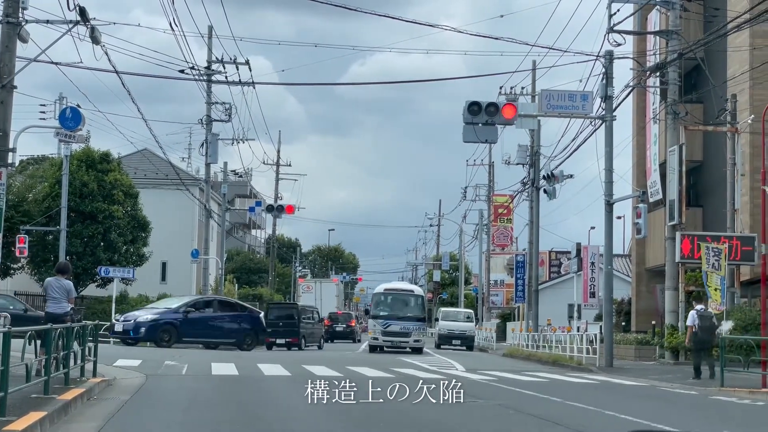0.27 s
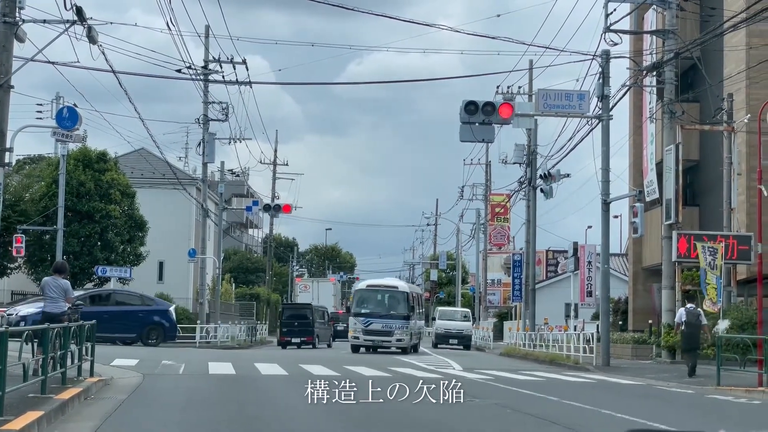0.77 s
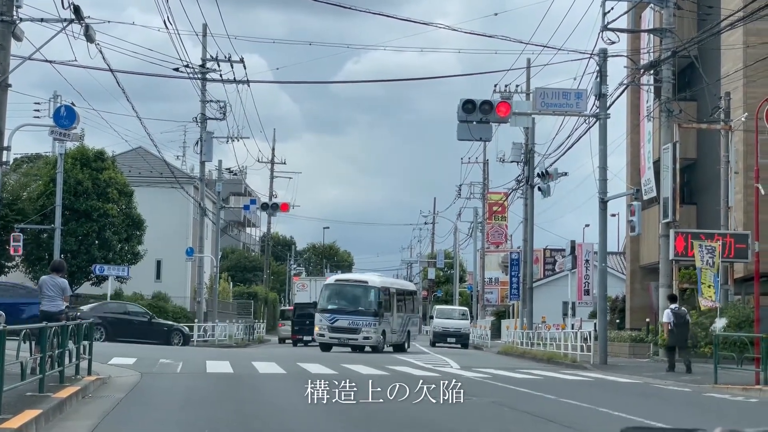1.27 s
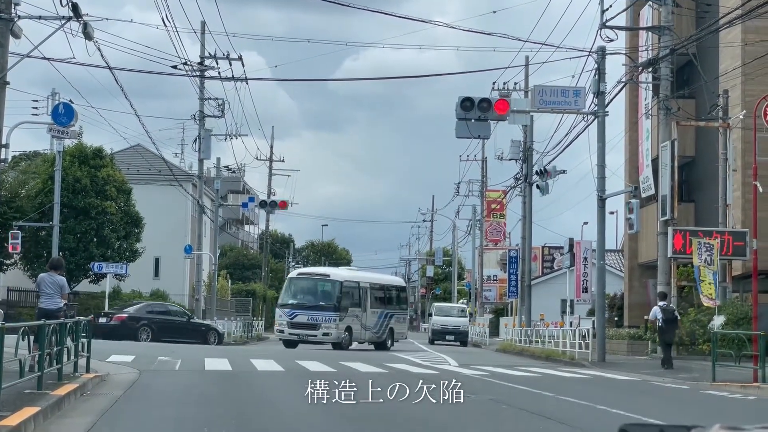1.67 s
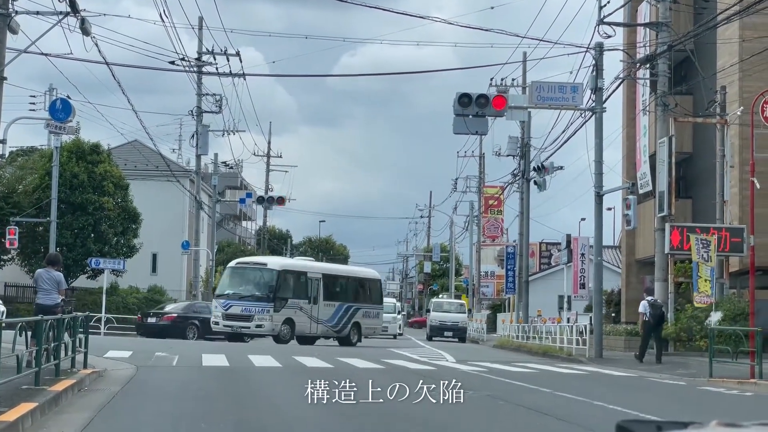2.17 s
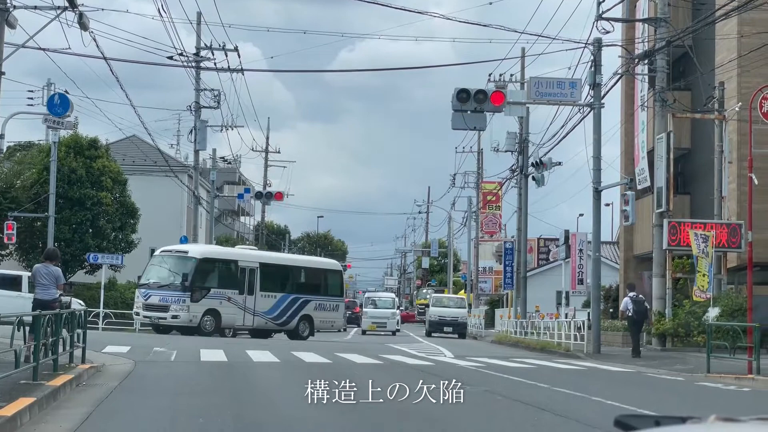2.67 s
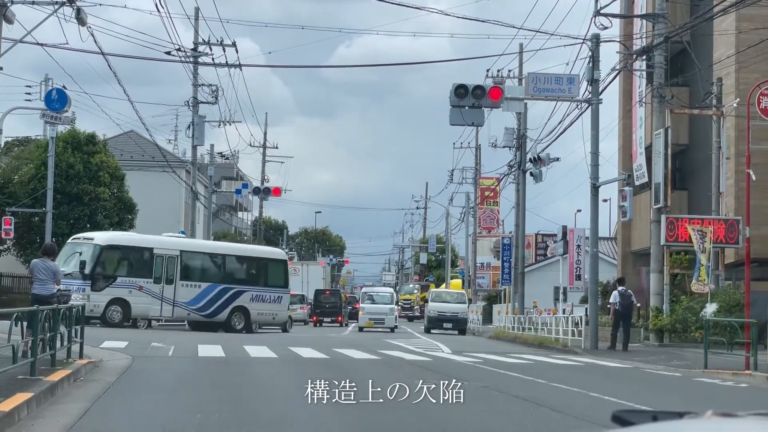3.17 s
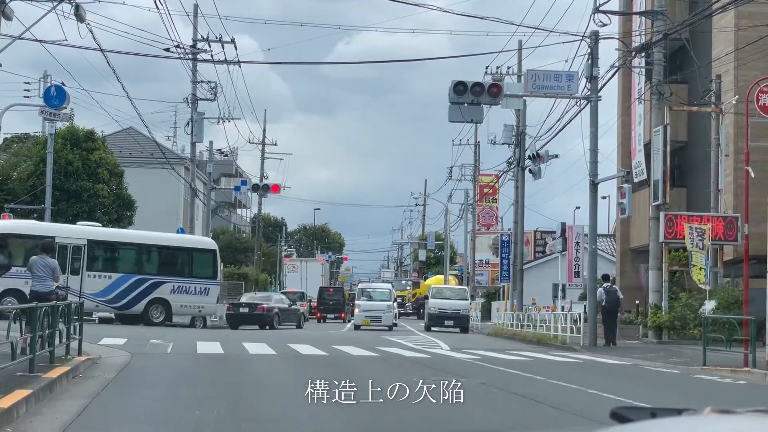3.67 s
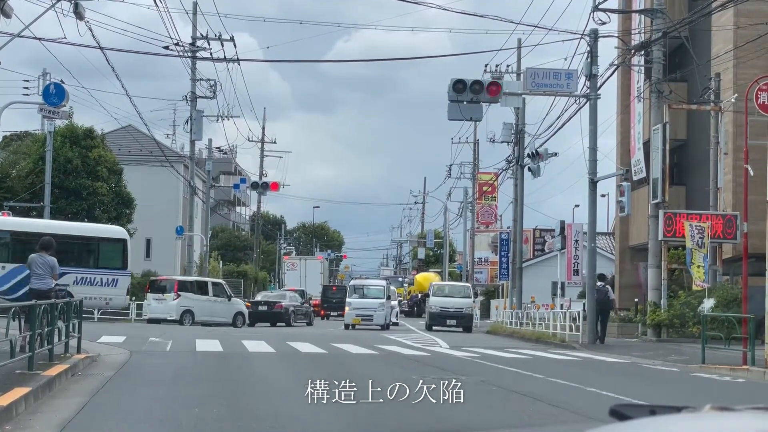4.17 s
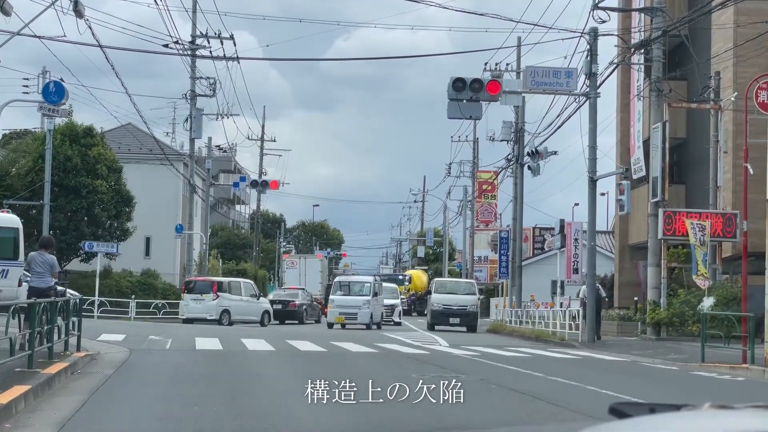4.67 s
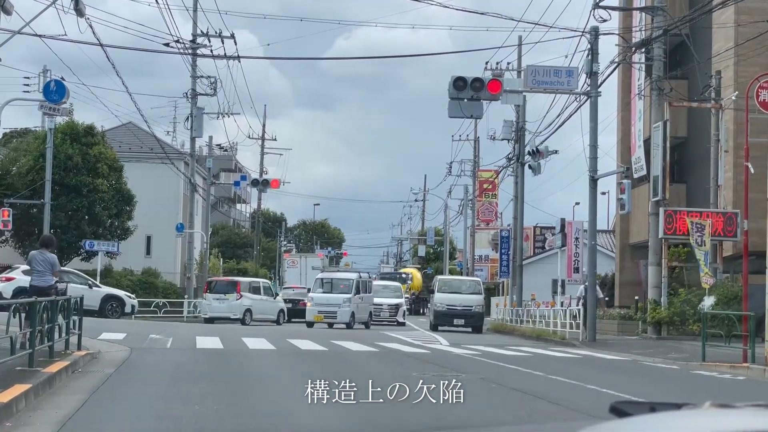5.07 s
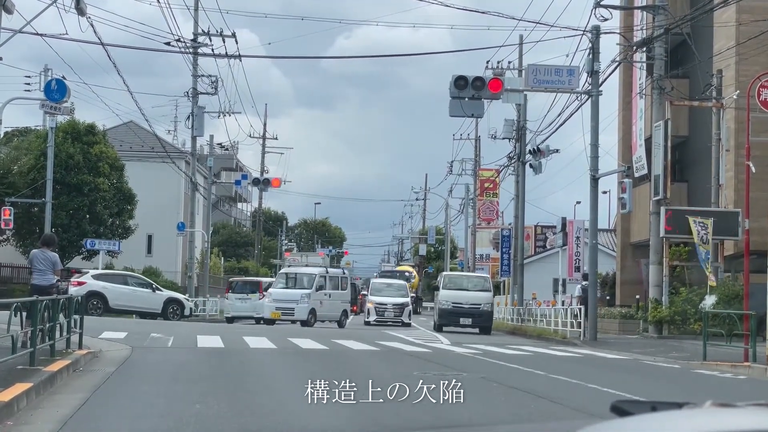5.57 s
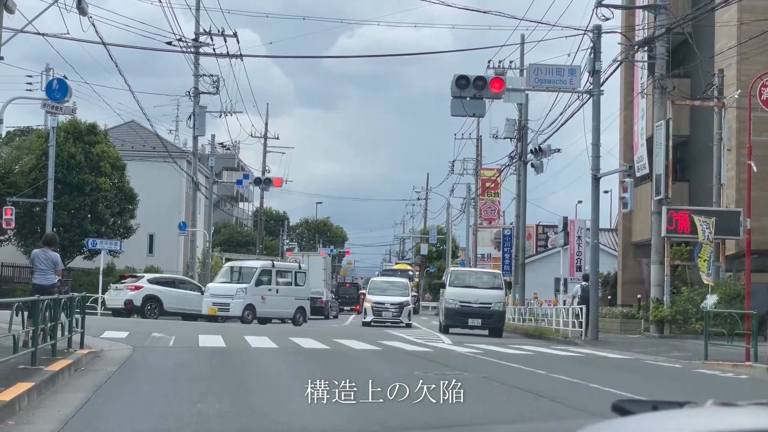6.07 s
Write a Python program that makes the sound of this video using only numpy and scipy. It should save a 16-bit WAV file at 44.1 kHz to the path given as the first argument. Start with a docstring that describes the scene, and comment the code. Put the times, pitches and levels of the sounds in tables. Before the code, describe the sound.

A close, boxy stereo cabin sound, mostly low end. Engine throb and traffic rumble lie beneath a thin steady fan tone and soft vent air. It starts quieter, jumps up slightly, then keeps swelling. A bus engine labours faintly through a gear change, with brief puffs of released air. Cars pull up with a noisy drone; finally the fan tone sags and the idle briefly surges.

```python
"""Inside a car idling at a crossing, heard in stereo through a phone. From the start the engine's firing orders
boom in the cabin, a seven-blade fan whines, the air blower hums and traffic rumbles, all as wavering sines and
shaped noise. The level creeps up, with one step near 0.9 s. Soon after 2 s a bus comes up as a sagging, climbing
set of sines, with three short hisses of air from a vehicle. Near 4 s the roar grows and the noisy drone of cars
pulling up joins in; at 5.36 s the fan switches off and runs down, and the engine speed overshoots."""
import sys
import numpy as np
from scipy import signal
from scipy.fft import rfft, irfft, next_fast_len
from scipy.io import wavfile
from scipy.ndimage import uniform_filter1d, map_coordinates

SR = 44100
rng = np.random.default_rng(int(sys.argv[2]) if len(sys.argv) > 2 else 0)


def dump_mix(stems):
    """Bounce the given channels to the path in sys.argv[1] as a 16-bit WAV at rate SR."""
    frames = np.atleast_2d(stems).T  # one column per channel
    limited = np.clip(frames, -1, 1)  # hard clip at full scale
    pcm = np.round(limited * 32767).astype(np.int16)
    wavfile.write(sys.argv[1], SR, pcm)


N = 278712  # length in samples
# All source levels below are those before the overall level and the microphone in record().


def amp(db):
    """Turn decibels into a plain gain."""
    return 10 ** (np.asarray(db) / 20)


def unit(x):
    """Scale a signal to an rms of 1."""
    return x / np.sqrt(np.mean(x ** 2) + 1e-20)


def along(points, hz):
    """Read each column after the frequency at the given frequencies, on a log axis."""
    f, *columns = np.transpose(points)
    return [np.interp(np.log(hz + 1), np.log(f + 1), column) for column in columns]


def curves(rows):
    """Draw each column after the time as a curve with one value per sample."""
    times, *columns = np.transpose(rows)
    return [np.interp(np.arange(N) / SR, times, column) for column in columns]


def since(s):
    """Seconds gone by since the moment s, zero before it."""
    return np.maximum(np.arange(N) / SR - s, 0)


def bell(s, width):
    """A smooth hump of height 1 around the moment s, down to 1/e at width seconds either side."""
    return np.exp(-((np.arange(N) / SR - s) / width) ** 2)


def rise(s, slope_s):
    """A smooth S-shaped rise from 0 to 1, half way up at the moment s."""
    return 1 / (1 + np.exp((s - np.arange(N) / SR) / slope_s))


def wobble(rate):
    """A smooth random curve through `rate` random points a second."""
    points = rng.standard_normal(int(N * rate / SR) + 4)
    return map_coordinates(points, [np.arange(N) * rate / SR])


def tone(turns, db, pan_db, waver_db, drift, locked=False):
    """A sine on a running count of turns, unsteady in level and phase; it starts at random unless locked."""
    start = rng.random() * (not locked)
    phase = 2 * np.pi * (turns + start) + drift * wobble(5)  # drift in radians
    level = np.sqrt(2) * amp(db + waver_db * wobble(6))  # sqrt(2) makes db an rms level
    return level * np.sin(phase) * amp([[pan_db / 2], [-pan_db / 2]])


def rush(spectrum, patchy_db):
    """Patchy noise of rms 1 as a stereo pair, with opposite sides near 8.7 kHz."""
    # how the left and right channels differ: f/Hz, likeness/0-1, left over right/dB, lead of the right/rad
    stereo = [(60, .995, .2, 0), (200, .91, 3.5, -.1), (480, .9, .5, -.1), (720, .2, -1, -1.3),
              (860, .72, 3.5, -.4), (1250, .5, 1.5, -.9), (1500, .7, 3.5, -.3), (2200, .985, 0, 0),
              (3000, .87, 0, -.55), (5200, .84, 0, -.6), (5400, .9, 0, 0), (5700, .72, 0, 1.5),
              (6900, .7, 0, .8), (8150, .75, 0, 2.4), (8450, 1, 0, np.pi), (8900, 1, 0, np.pi),
              (9200, .9, 0, 3.4), (11500, .65, 0, 4.7), (12900, 1, 0, 2 * np.pi)]
    z = signal.stft(rng.standard_normal((2, N)), nperseg=512)[2]
    field = rng.standard_normal(z.shape[1:])
    field = uniform_filter1d(uniform_filter1d(field, 6, 0), 14, 1)  # smooth over pitch, then time
    patchy = signal.istft(z * amp(patchy_db * unit(field)), nperseg=512)[1][:, :N]

    m = next_fast_len(N + 8192)
    shared, own = rfft(patchy, m)
    hz = np.fft.rfftfreq(m, 1 / SR)
    alike, pan_db, lead = along(stereo, hz)
    alike = np.clip(alike, 0, 1)
    left = shared * amp(pan_db / 2)
    right = alike * shared + np.sqrt(1 - alike ** 2) * own
    right = right * amp(-pan_db / 2) * np.exp(1j * lead)
    shaped = np.array([left, right]) * amp(along(spectrum, hz)[0])
    return unit(irfft(shaped, m)[:, :N])


def engine():
    """Idling engine: low multiples of the firing rate keep step with it; higher ones waver more."""
    # firing rate, which hunts a little and overshoots when the fan unloads the engine: t/s, f/Hz
    idle = [(0, 28.46), (.4, 28.31), (1, 27.93), (2.4, 27.56), (3.8, 27.6), (4.4, 28), (4.9, 27.95),
            (5.3, 27.65), (5.6, 29.37), (5.95, 28.75), (6.32, 28.25)]
    # orders that boom in the cabin: t/s, second order level/dB, third order level/dB
    boom = [(0, -34, -34), (.4, -39, -40), (.8, -40.5, -42.5), (1.5, -39, -40.5), (2.2, -34.5, -38.5),
            (2.8, -36.5, -39.5), (3.3, -34, -38.5), (3.8, -35.5, -39), (4.2, -35.5, -36.5),
            (4.5, -41, -39.5), (5, -35, -36.5), (5.45, -35.5, -37.5), (5.75, -28, -33.5), (6, -43, -42),
            (6.32, -31.5, -34.5)]
    # weaker orders: multiple of the firing rate, level/dB, left over right/dB
    orders_high = [(2.5, -52, -1.5), (3.5, -51, 4), (5, -48.5, -1.5), (6, -58, 9.5), (7, -48, 5),
                   (8, -54.5, 5)]
    cabin_hz = 40  # orders above this cabin resonance swing the opposite way
    turns = np.cumsum(curves(idle)[0]) / SR
    low_db = [-40, *curves(boom), -45]  # first to fourth order
    sound = 0
    for k, db in enumerate(low_db, 1):
        sign = 1 if k * idle[0][1] < cabin_hz else -1
        sound = sound + sign * tone(k * turns, db, .1 * k, waver_db=.3 * k, drift=.1, locked=True)
    for k, db, pan in orders_high:
        sound = sound + tone(k * turns, db, pan, waver_db=.27 * k, drift=.13 * k)
    return sound


def fan():
    """Cooling fan: seven blades pass each turn, and a slight unbalance sounds once a turn."""
    # blade tone: t/s, level/dB
    blade = [(0, -49.5), (.9, -50), (1.1, -48), (2.5, -48.5), (3.5, -47.5), (4.5, -46.5), (5.36, -46),
             (5.42, -49.5), (5.78, -49.5), (5.86, -57), (5.97, -58), (6.04, -50), (6.32, -51)]
    blades, blade_hz = 7, 315.6
    slow_hz, settles_s = 1.6, 1.5  # starts this far flat; time constant of settling
    off_s, coast_s, loosens_s = 5.36, 3.5, .3  # switch-off, coasting time constant, loosening time
    coasting = since(off_s)
    running_hz = blade_hz - slow_hz * np.exp(-since(0) / settles_s)
    turns = np.cumsum(running_hz * np.exp(-coasting / coast_s)) / SR
    loose = np.clip(coasting / loosens_s, 0, 1)  # coasting, the tone grows unsteady
    loose_turns = turns + .03 * loose * wobble(14)
    whine = tone(loose_turns, curves(blade)[0], 8, waver_db=.2 + 1.3 * loose, drift=.03)
    unbalance = tone(turns / blades, -42.5, .1, waver_db=1, drift=.15)
    return whine + unbalance


def blower():
    """Air blower: faint wavering tones, a low wavering hum, and rushing air in the vents."""
    # faint tones: f/Hz, level/dB, left over right/dB
    faint = [(177, -57, 6), (354, -72, -2), (531.6, -64, -2), (616.4, -71, 0), (705, -76, -4),
             (792, -75, 1), (885.5, -70.5, 3)]
    # low hum: f/Hz, level/dB
    hum_hz, hum_db = (75, -41.5)
    # colour of the air from the vents: f/Hz, relative level per Hz/dB
    vents = [(1500, -32), (3000, -6.5), (5300, -1.5), (7000, -2.5), (8200, -2), (12300, -6), (13600, -18),
             (15000, -10)]
    t = np.arange(N) / SR
    lines = sum(tone(hz * t, db, pan, waver_db=2.5, drift=.9) for hz, db, pan in faint)
    air = amp(-66 + .6 * wobble(30)) * rush(vents, patchy_db=1.5)
    hum = tone(hum_hz * t, hum_db, .3, waver_db=1.2, drift=.5)
    return lines + air + hum


def bus():
    """A diesel pulling away: its firing orders sag at a gear change, then climb as it gathers speed."""
    # the bus crossing: t/s, firing rate f/Hz, level/dB
    drive = [(0, 32.5, -79), (2.2, 32.7, -65), (2.6, 32.43, -54), (3.3, 30.8, -54), (3.8, 31.61, -48),
             (4.3, 32.55, -49.5), (4.9, 33.52, -45.5), (5.3, 33.73, -52), (5.8, 33, -68),
             (6.32, 31.91, -78)]
    # its orders: multiple of the firing rate, level added/dB
    orders = [(2, 0.5), (3, 2.5), (4, -1), (5, -14.5)]
    hz, db = curves(drive)
    turns = np.cumsum(hz) / SR
    return sum(tone(k * turns, db + order_db, 2.1, waver_db=2.5, drift=.5) for k, order_db in orders)


def puffs():
    """Air let out by a vehicle: each hiss opens softly, holds and dies away, in a broad band."""
    # hisses: t/s, hold/s, time to fall 60 dB/s, centre f/Hz, level/dB
    hisses = [(2.328, .03, .3, 6000, -65), (2.76, .04, .35, 1500, -59.5), (2.838, .025, .25, 8000, -63.5)]
    opens_s = .01
    sound = 0
    for s, hold, t60, hz, db in hisses:
        # f/Hz, relative level per Hz/dB
        band = [(hz / 2.7, -30), (hz / 1.5, -4), (hz, 0), (hz * 1.5, -5), (hz * 1.8, -30)]
        opening = np.clip(since(s) / opens_s, 0, 1)
        dying = amp(db - 60 * since(s + hold) / t60)
        sound = sound + opening * dying * rush(band, patchy_db=2.5)
    return sound


def traffic():
    """Low rumble through the body, a roar through glass and vents, and the drone of oncoming cars."""
    # colours of the three noises: f/Hz, relative level per Hz/dB
    rumble_colour = [(12, -44), (22, -22), (35, -10), (45, -7.5), (60, -3), (85, -12.5), (105, -12.5),
                     (150, -12), (200, -16), (240, -19.5), (330, -24), (500, -74)]
    roar_colour = [(200, -18.5), (300, -1), (400, -2.5), (490, 2), (560, -4.5), (720, -11.5), (780, -9),
                   (870, -10), (1000, -11), (1500, -14.5), (1900, -18.5), (2800, -20), (3100, -24.5),
                   (5300, -32.5), (9000, -49)]
    drone_colour = [(250, -31), (350, 3), (470, 2.5), (620, -4), (750, -6.5), (1000, -33.5)]  # cars pulling up to turn
    # swells and lulls: t/s, half width to 1/e/s, rumble change/dB, roar change/dB
    swells = [(2.85, 0.12, 3.5, 1), (4.15, 0.25, 0, 0.5), (5, 0.23, 3.5, -0.7), (5.3, 0.2, -1, 1),
              (5.7, 0.45, 2, -0.5), (6.32, 0.35, -1.5, -1.5)]
    rumble_db = -37.5 + sum(db * bell(s, width) for s, width, db, _ in swells)
    roar_db = -49 + 3.5 * rise(3.91, .49)  # grows as vehicles come closer
    roar_db = roar_db + sum(db * bell(s, width) for s, width, _, db in swells)
    rumble = amp(rumble_db + .6 * wobble(3)) * rush(rumble_colour, patchy_db=.8)
    drone = amp(-55.5) * rise(3.97, .13) * rush(drone_colour, patchy_db=2)
    roar = amp(roar_db + .35 * wobble(12)) * rush(roar_colour, patchy_db=.5)
    return rumble + drone + roar


def scene():
    """Add up everything that reaches the phone."""
    return engine() + fan() + blower() + bus() + puffs() + traffic()


def record(dry):
    """The level rises with time; the top end rolls off and nothing is kept above the band limit."""
    # the microphone's top end: f/Hz, level/dB
    mic = [(13200, 0), (14000, -5), (14500, -12), (15000, -18)]
    top_hz = 15000
    final_db, creep_db, creep_s = -.71, 12, 2.496  # creeps up to the final level; time constant
    step_s, step_db, step_length_s = .93, 4, .03  # one sudden step up
    step = np.clip(since(step_s - step_length_s / 2) / step_length_s, 0, 1)
    level_db = final_db - creep_db * np.exp(-since(0) / creep_s) - step_db * (1 - step)
    m = next_fast_len(N + 8192)
    hz = np.fft.rfftfreq(m, 1 / SR)
    top = amp(along(mic, hz)[0]) * (hz < top_hz)
    return irfft(rfft(dry * amp(level_db), m) * top, m)[:, :N]


dry = scene()
out = record(dry)
dump_mix(out)
```